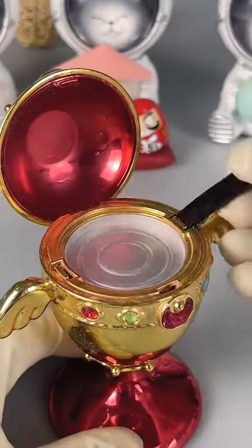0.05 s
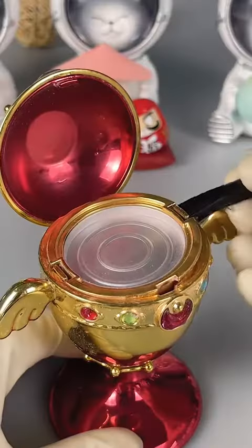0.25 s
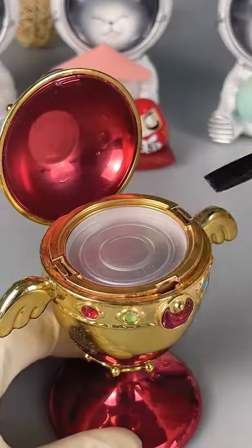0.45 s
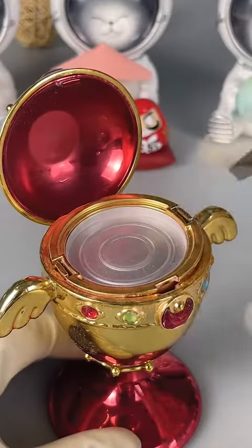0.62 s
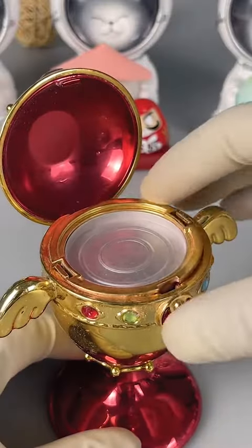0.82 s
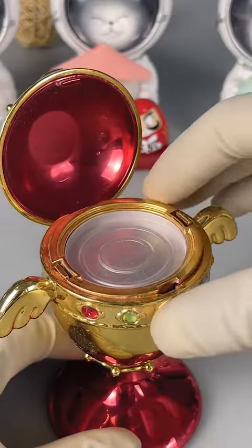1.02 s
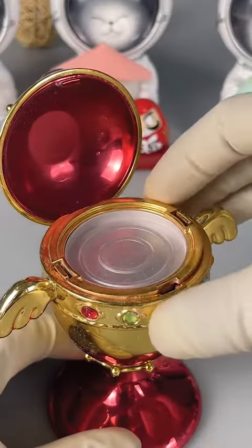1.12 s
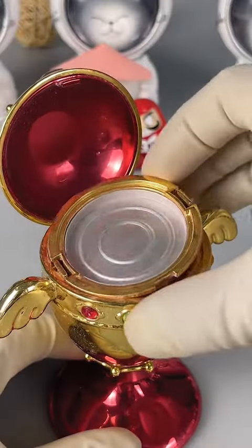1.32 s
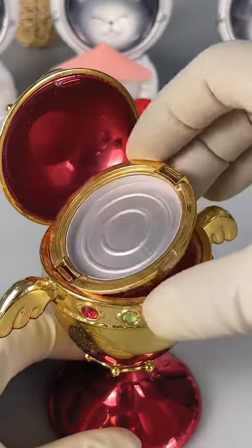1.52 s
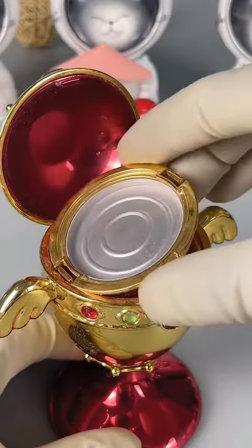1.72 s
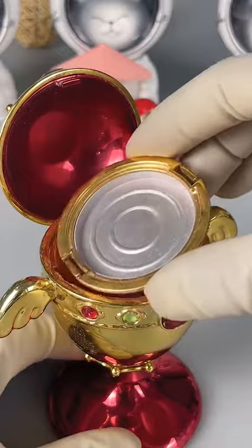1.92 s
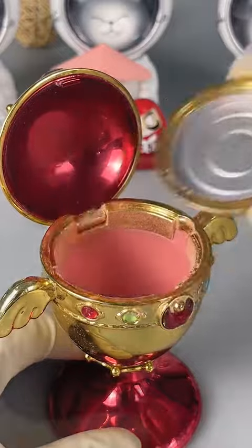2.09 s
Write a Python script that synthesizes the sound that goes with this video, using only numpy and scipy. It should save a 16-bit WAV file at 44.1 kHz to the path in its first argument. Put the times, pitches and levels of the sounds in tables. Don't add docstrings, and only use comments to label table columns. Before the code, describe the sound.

Close clicking and snapping of a hollow trinket case, first pried with a lever, then its tray popped free by gloved fingers with soft rubbing; a low fan drone shifts pitch behind, in a small hard room.

```python
import sys
import numpy as np
from scipy import signal
from scipy.fft import rfft, irfft
from scipy.io import wavfile
from scipy.ndimage import uniform_filter1d

SR = 44100
rng = np.random.default_rng(int(sys.argv[2]) if len(sys.argv) > 2 else 0)


def decibels_to_gain(level_db):
    exponent = np.asarray(level_db, float) / 20
    return 10 ** exponent


def file_out(sig):
    cols = np.atleast_2d(sig).T
    lim = np.clip(cols, -1, 1)
    pcm = np.round(lim * 32767).astype(np.int16)
    wavfile.write(sys.argv[1], SR, pcm)


N = 94815


def rms_one(x):
    return x / np.sqrt(np.mean(x ** 2) + 1e-20)


def at_hz(points, hz, column=1):
    p = np.array(points, float)
    return np.interp(np.log(np.maximum(hz, 1)), np.log(p[:, 0]), p[:, column])


def colour(x, points):
    gain = decibels_to_gain(at_hz(points, np.fft.rfftfreq(N, 1 / SR)))
    return irfft(rfft(x) * gain, N)


def band(x, low_hz, high_hz):
    sos = signal.butter(3, [low_hz, high_hz], "band", fs=SR, output="sos")
    return signal.sosfilt(sos, x)


def ring(clicks, hz, t60):
    radius = decibels_to_gain(-60 / (t60 * SR))
    angle = 2 * np.pi * hz / SR
    feedback = [1, -2 * radius * np.cos(angle), radius * radius]
    return signal.lfilter([0, np.sin(angle)], feedback, clicks + 1e-18)


def narrow(hz, width_hz):
    t60 = np.log(1000) / np.pi / width_hz
    noise = rng.standard_normal(N + SR // 4)
    return rms_one(ring(ring(noise, hz, t60), hz, t60)[-N:])


def window(s, length, edge):
    t = np.arange(N) / SR
    return np.clip((t - s) / edge, 0, 1) * np.clip((s + length - t) / edge, 0, 1)


def hum(hz):
    wobble_hz = 3.5 * rms_one(uniform_filter1d(rng.standard_normal(N), size=3000))
    sine = np.sin(2 * np.pi * np.cumsum(hz + wobble_hz) / SR)
    return rms_one(2.2 * sine + 0.5 * narrow(hz, width_hz=33))


# f/Hz, level/dB per Hz
AIR_LOW = [(18, -44.5), (33, -29.5), (55, -10.5), (113, 3.5), (204, 0), (282, -4), (333, -3.5), (447, -9),
           (718, -25.5), (1500, -46.5), (1950, -68.5), (3300, -120)]
# t/s, level/dB
AIR_FLOW = [(0.0, -56), (0.28, -53.5), (0.43, -50), (0.85, -54), (0.98, -55.5), (1.23, -58.5), (1.51, -54),
            (1.979, -71), (2.15, -65)]
# f/Hz, level/dB per Hz
HISS = [(710, -29.5), (1200, -2), (1730, -2.5), (2620, -4), (3360, -4.5), (4260, -6), (7910, -14.5),
        (12600, -9.5), (16000, -16)]
AIR_LOW_DB, HISS_DB = -46, -71.5
AIR_FOLLOWS = 0.65
LEVEL_DIP_S, LEVEL_DIP_LENGTH_S, LEVEL_DIP_DEPTH = 0.67, 0.046, 0.6


def airflow():
    flow_db = np.interp(np.arange(N) / SR, *np.transpose(AIR_FLOW))
    rush = rms_one(colour(rng.standard_normal(N), AIR_LOW + [(4000, -93)]))
    upper = signal.sosfilt(signal.butter(2, 420, "high", fs=SR, output="sos"), rush)
    swell = decibels_to_gain(AIR_FOLLOWS * (flow_db - flow_db.min())) - 1
    hiss = rms_one(colour(rng.standard_normal(N), [(500, -38.0)] + HISS))
    return decibels_to_gain(AIR_LOW_DB) * (rush + swell * upper) + decibels_to_gain(HISS_DB) * hiss


# t/s, drone f/Hz, drone level/dB, blade hum f/Hz, hum level/dB
FAN = [
    (0, 133, -43.5, 470, -60),
    (.2, 116.8, -45.5, 400, -56),
    (0.802, 141.3, -52, 386.8, -48),
    (1.581, 103.9, -47, 306.4, -47.5),
]
# t/s, length/s, f/Hz, width/Hz, level/dB
WHISTLE = [
    (1.1, .4, 4450, 67, -73),
    (1.62, .53, 3400, 350, -79),
]
STEP_S = 0.012


def fan():
    ends = [row[0] for row in FAN[1:]] + [N / SR + 1]
    tones = 0
    for (s, drone_hz, drone_db, hum_hz, hum_db), end in zip(FAN, ends):
        tone = decibels_to_gain(drone_db) * narrow(drone_hz, width_hz=27) + decibels_to_gain(hum_db) * hum(hum_hz)
        tones = tones + np.sqrt(window(s - STEP_S, end - s + STEP_S, STEP_S)) * tone
    for s, length, hz, width_hz, db in WHISTLE:
        tones = tones + decibels_to_gain(db) * window(s, length, 0.037) * narrow(hz, width_hz)
    level_dip = 1 - LEVEL_DIP_DEPTH * window(LEVEL_DIP_S, LEVEL_DIP_LENGTH_S, 0.009)
    return level_dip * (tones + airflow())


# f/Hz, level/dB per Hz, time to fall 60 dB/s
ROOM = [(300, -1, 0.77), (900, 4.5, 0.45), (1910, -3, 0.42), (3000, -1, .4), (4800, -6.5, 0.51),
        (6950, 6, 0.11), (9300, -4, 0.4), (11900, -4.5, 0.16)]
# f/Hz, side level against mid/dB
WIDTH = [(60, -48), (110, -49), (200, -33), (380, -25.5), (700, -10), (1290, 0.5), (2380, -2.5),
         (4400, -17), (8120, 0), (15000, -6.5)]
ROOM_DB, ROOM_ONSET_S = -9.5, 0.00095


def room(x):
    t = np.arange(SR // 2) / SR
    edges = 200 * 2 ** np.arange(0, 6.6, 1 / 3)
    white = rng.standard_normal((2, 2, len(t)))
    tail = 0
    for k, (low, high) in enumerate(zip(edges, edges[1:])):
        hz = np.sqrt(low * high)
        sos = signal.butter(2, [low, high], "band", fs=SR, output="sos")
        fade = decibels_to_gain(at_hz(ROOM, hz) - 60 * t / at_hz(ROOM, hz, column=2))
        mid_side = [[1], [decibels_to_gain(at_hz(WIDTH, hz))]]
        tail = tail + signal.sosfilt(sos, white[k % 2]) * fade * mid_side
    tail = tail * (1 - np.exp(-t / ROOM_ONSET_S)) * decibels_to_gain(ROOM_DB) / 40
    return signal.fftconvolve(x[None], tail, axes=1)[:, :N]


# t/s, rise/s, length/s, level/dB, sheen level/dB, top level/dB
RUBS = [(0.204, 0.0023, 0.023, -43.5, -7, -8), (0.223, 0.021, 0.068, -58, -19, -21),
        (0.299, .015, 0.064, -56.5, -4, -14), (0.354, .006, 0.033, -65, -11, 1),
        (0.384, 0.013, .06, -48, -18, -12), (0.428, .004, .05, -51, -25, -19),
        (0.655, 0.027, 0.089, -64.5, -3, -2), (.797, 0.0063, 0.048, -72.5, 16.5, 9.5),
        (1.224, .012, .03, -69, -5, -4.5), (1.282, 0.015, 0.054, -57, -15, -19),
        (1.503, 0.0071, 0.022, -54.5, 1.5, -1), (1.52, 0.023, 0.064, -58, -2.5, -6),
        (1.553, 0.0035, 0.043, -58.5, -8, -11), (.02, 0.047, 0.39, -72.5, -22, -2)]
# low f/Hz, high f/Hz
RUB_BANDS = [
    (1800, 4600),
    (6300, 10500),
    (11800, 14000),
]
RUB_GRAINS_PER_S, RUB_CLUMP_DB = 3500, 2.5


def rubs():
    size = decibels_to_gain(4.0 * rng.exponential(1, N)) * rng.choice([-1, 1], N)
    grains = size * (rng.random(N) < RUB_GRAINS_PER_S / SR)
    parts = []
    for edges in RUB_BANDS:
        slow = uniform_filter1d(uniform_filter1d(rng.standard_normal(N), size=150), size=150)
        clump = decibels_to_gain(RUB_CLUMP_DB * rms_one(slow))
        parts.append(rms_one(band(grains, *edges) * clump))
    body, sheen, top = parts
    t = np.arange(N) / SR
    out = np.zeros(N)
    for s, rise, length, db, sheen_db, top_db in RUBS:
        swell = np.clip((t - s) / rise, 0, 1) ** 2
        fade = np.exp(-(1.2 * (t - s) / length) ** 2)
        out += decibels_to_gain(db) * swell * fade * (body + decibels_to_gain(sheen_db) * sheen + decibels_to_gain(top_db) * top)
    return out


NOTE_S = [.211, .210, .2195, .3045, .4308, .427, .4275, .3042, .4650, .4135, .8325, .837, .8325, .832,
          1.670, 1.296, 1.297, 1.5125, 1.560, 1.5865]
# f/Hz, level/dB, time to fall 60 dB/s
THUMPS = [(123, -27, 0.089), (296, -30.5, .03), (228, -30, 0.042), (720, -29.5, 0.027),
          (4305, -11.5, 0.0047), (958, -20, 0.02), (728, -19.5, 0.026), (1900, -27, 0.013),
          (1940, -25.5, 0.025), (2060, -27, 0.017), (400, -25, 0.051), (290, -26.5, 0.055),
          (957, -17.5, 0.023), (746, -28, 0.027), (2970, -50, 0.012), (3260, -24.5, 0.0032),
          (1240, -34, 0.013), (5910, -38, 0.018), (890, -30, 0.028), (940, -38, 0.012)]


def thumps():
    out = np.zeros(N)
    for s, (hz, db, t60) in zip(NOTE_S, THUMPS):
        click = decibels_to_gain(db) * (np.arange(N) == int(s * SR))
        out += band(ring(click, hz, t60), 0.5 * hz, 2 * hz)
    return out


def grit(clicks):
    t = np.arange(SR // 50) / SR
    shape = np.exp(-t / 0.0014) * (1 - np.exp(-t / 0.00035))
    shape = shape / np.sqrt(np.sum(shape ** 2))
    return signal.fftconvolve(np.abs(clicks), shape)[:N] * rng.standard_normal(N)


# t/s, then
# catch, shell, tray and crack level/dB
TOUCHES = [(0.2081, -39.5, -36, -38, -51.5), (0.2081, -28.5, -32, -30.5, -36),
           (0.2164, -39, -39, -29.5, -52.5), (0.3027, -43, -36, -32.5, -58.5),
           (0.3215, -33, -55.5, -44, -48.5), (0.3521, -50, -45, -45, -63.5), (0.3997, -22, -42, -29.5, -45.5),
           (0.4119, -30.5, -31.5, -33.5, -54), (0.4221, -32.5, -23.5, -19.5, -34),
           (0.4250, -1, -18, -10, -16), (0.4305, -11, -21.5, -27, -27.5), (.4405, -29.5, -36, -36, -44.5),
           (.4555, -31, -34, -38, -49.5), (0.4636, -17, -23, -20, -32.5), (0.4887, -36.5, -32, -52, -42.5),
           (0.7003, -42.5, -57.5, -57.5, -64), (0.7491, -51.5, -59, -58.5, -67),
           (0.8084, -23.5, -35.5, -33, -58), (0.8239, -20, -44.5, -21, -52), (0.826, -11, -21.5, -8, -35),
           (0.8312, -11, -22.5, -20, -25.5), (0.8322, -10.5, -36, -17.5, -38),
           (0.8372, -23.5, -40.5, -18.5, -51), (1.239, -44, -46.5, -40.5, -55),
           (1.296, -26.5, -43.5, -37, -49.5), (1.2225, -54, -54.5, -51, -62.5),
           (1.512, -39, -40.5, -55, -45.5), (1.5178, -47, -39, -57, -54.5), (1.5429, -48, -43, -62, -64),
           (1.5597, -24.5, -30.5, -59, -44), (1.5659, -34, -32.5, -66.5, -56),
           (1.5854, -31, -33.5, -64, -54), (1.5985, -50, -53, -64, -68), (1.6693, -63, -48.5, -57, -64),
           (1.7314, -60.5, -64, -62.5, -69), (1.907, -63, -58.5, -75.5, -78)]
# f/Hz, level/dB, time to fall 60 dB/s
CATCH = [(2650, -14, 0.0043), (3210, -11, 0.0054), (3830, -9.5, 0.0033), (3990, -13, 0.012),
         (4450, -9, 0.0034), (5064, -14, 0.0099), (5440, -17.5, 0.011)]
# f/Hz, level/dB, time to fall 60 dB/s
SHELL = [(385.5, -2.5, 0.022), (600, -3, .03), (685, -7, 0.024), (734, -1, 0.031), (830, -5, .02),
         (977, -3, 0.02), (1140, -6, 0.0088)]
# f/Hz, level/dB, time to fall 60 dB/s
TRAY = [(1252, -6.5, 0.011), (1599, -10.5, 0.03), (1793, -4.5, 0.019), (2075, -8, 0.016)]
# f/Hz, level/dB, time to fall 60 dB/s
CRACK = [(6600, -5, 0.0018), (7460, -4.5, 0.0035), (9030, -3.5, 0.0035), (9700, -2.5, 0.0024),
         (12800, -4.5, 0.0018), (14300, -7.5, .002), (15200, -5, .002)]
# low f/Hz, high f/Hz
BANDS = [
    (2300, 6500),
    (324, 1400),
    (1076, 2500),
    (6410, 22000),
]
CONTACT_S, CHATTER_S, MODE_SPREAD_DB = 0.0003, 0.0008, 1.5


def touches():
    rows = np.array(TOUCHES)
    at = ((rows[:, 0] + CONTACT_S) * SR).astype(int)
    out = np.zeros(N)
    for k, modes in enumerate([CATCH, SHELL, TRAY, CRACK]):
        part = 0
        for j, (hz, db, t60) in enumerate(modes):
            spread, delay, bounce = rng.standard_normal((3, len(rows)))
            size = decibels_to_gain(rows[:, k + 1] + db + MODE_SPREAD_DB * spread) * (-1) ** j
            chatter_at = at + (CHATTER_S * SR * np.abs(delay)).astype(int) + 1
            clicks = np.zeros(N)
            clicks[at] = size
            clicks[chatter_at] += 0.7 * size * bounce
            if modes is CRACK:
                clicks = grit(clicks)
            part = part + ring(clicks, hz, t60)
        out += band(part, *BANDS[k])
    return out


# f/Hz, width/Hz
DIPS = [(6050, 190), (11700, 480)]
LIFTED_S, LIFTED_DB = 1.1, -0.5


def scene():
    case = touches() + thumps() + rubs()
    for hz, width_hz in DIPS:
        case = signal.lfilter(*signal.iirnotch(hz, hz / width_hz, fs=SR), case)
    wet, wet_side = room(case * decibels_to_gain(LIFTED_DB * window(LIFTED_S, 2, 0.052)))
    air = fan()
    mid = case + wet + air
    wide_air = colour(np.roll(air, 9000), WIDTH)
    gap = signal.butter(4, [2900, 7500], "bandstop", fs=SR, output="sos")
    side = decibels_to_gain(-11.0) * band(case, 11500, 15740) + decibels_to_gain(-1.5) * wet_side + signal.sosfilt(gap, wide_air)
    return np.array([mid + side, mid - side])


def band_limit(x):
    return signal.sosfilt(signal.butter(12, 16480, fs=SR, output="sos"), x)


def record(dry):
    top_cut = signal.ellip(10, 0.5, 70, 15900, fs=SR, output="sos")
    mix = signal.sosfilt(top_cut, dry)
    return band_limit(mix)


dry = scene()
out = record(dry)
file_out(out)
```